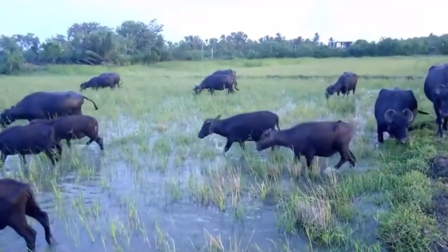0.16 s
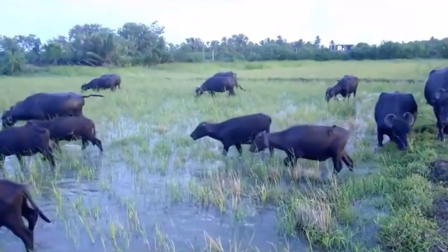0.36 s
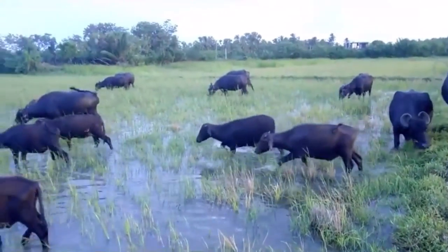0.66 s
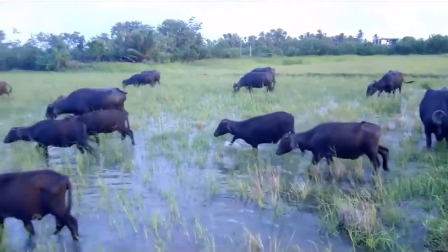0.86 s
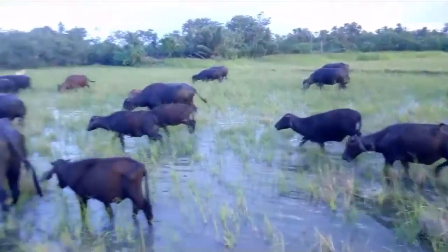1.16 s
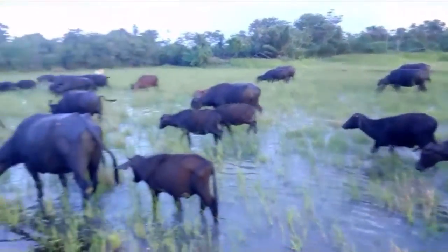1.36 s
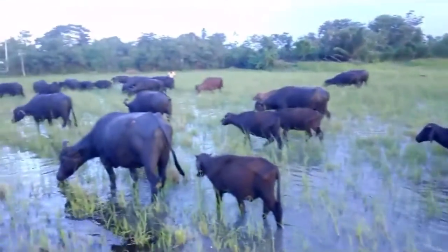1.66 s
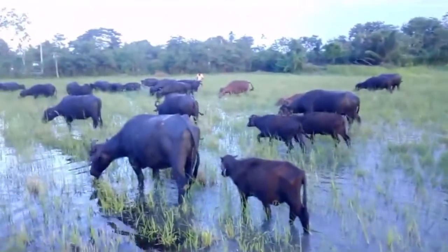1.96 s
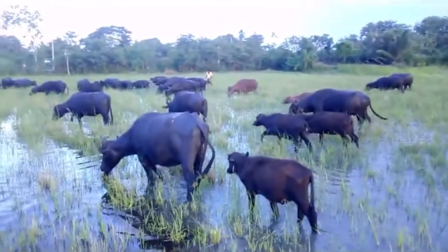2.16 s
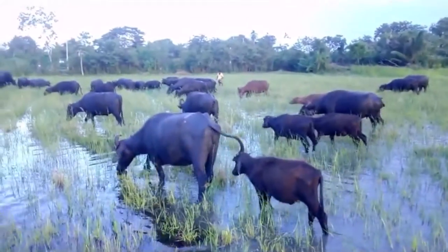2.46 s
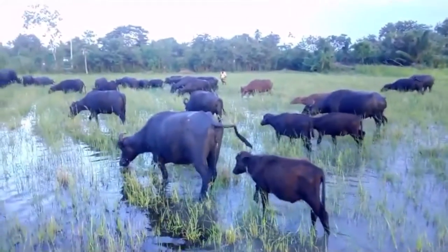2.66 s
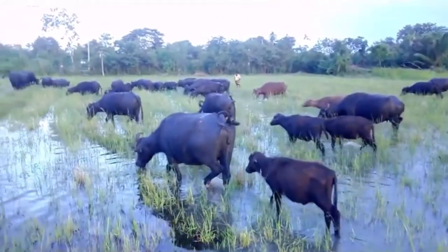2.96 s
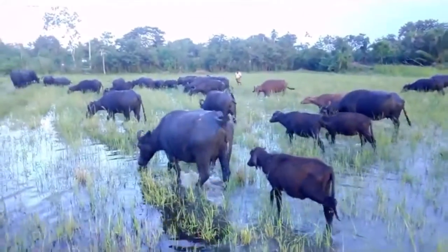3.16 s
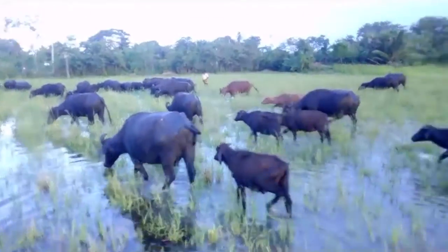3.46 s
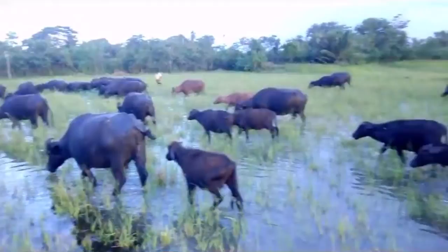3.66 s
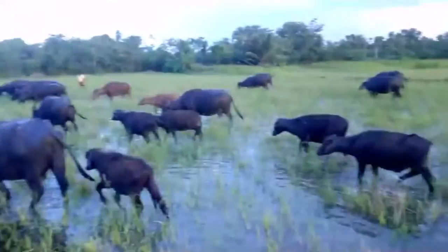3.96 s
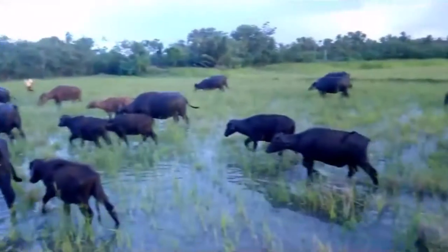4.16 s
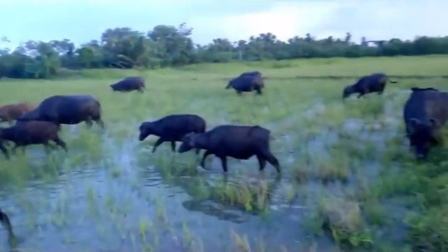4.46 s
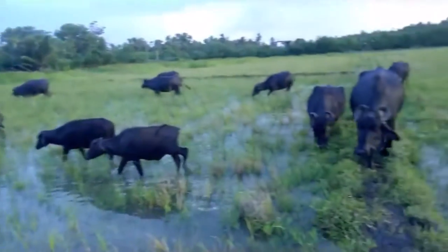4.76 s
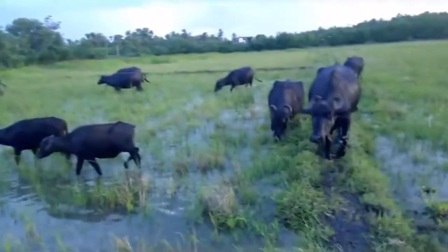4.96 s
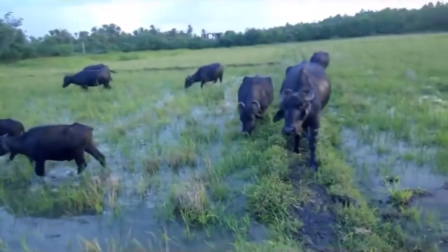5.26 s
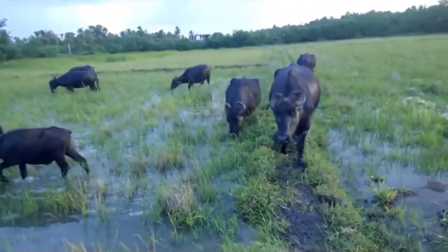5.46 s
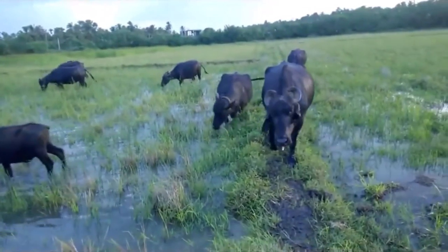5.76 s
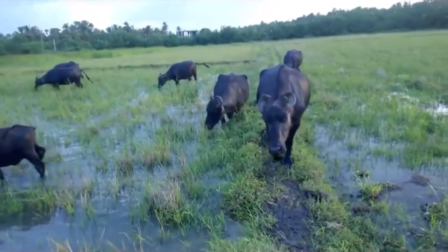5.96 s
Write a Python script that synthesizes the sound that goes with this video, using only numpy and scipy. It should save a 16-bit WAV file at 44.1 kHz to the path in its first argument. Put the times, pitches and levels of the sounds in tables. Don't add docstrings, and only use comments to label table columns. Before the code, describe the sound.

A water buffalo's loud nasal moo, already under way, sinks into a creak, then the herd wades on with sloshing water, plops and soft wind rumble.

```python
import sys
import numpy as np
from scipy import signal
from scipy.fft import rfft, irfft
from scipy.io import wavfile
from scipy.ndimage import uniform_filter1d

SR = 44100
rng = np.random.default_rng(int(sys.argv[2]) if len(sys.argv) > 2 else 0)


def unload_audio(sound):
    columns = np.transpose(np.atleast_2d(sound))
    steps = np.round(np.clip(columns, -1, 1) * 32767)
    wavfile.write(sys.argv[1], SR, steps.astype(np.int16))


def magnitude_from_level(level_db):
    exponent = np.asarray(level_db, float) / 20
    return 10 ** exponent


N = 268569


def evened(x):
    return x / np.sqrt(np.mean(x ** 2) + 1e-20)


def steady(x, size=1400):
    power = uniform_filter1d(uniform_filter1d(x ** 2, size), size)
    return x / np.sqrt(power + 1e-12)


def read(points, hz):
    f, value = np.transpose(points)
    return np.interp(np.log(hz + 1), np.log(f + 1), value)


def add(mix, s, sound):
    part = mix[round(s * SR):][:len(sound)]
    part += sound[:len(part)]


def swell(t, s, length):
    return np.exp(-((t - s) / length) ** 2)


def band_filter(x, order, hz, kind="low", run=signal.sosfilt):
    return run(signal.butter(order, hz, kind, fs=SR, output="sos"), x)


def resonate(x, hz, width):
    turn = np.exp(2j * np.pi * np.cumsum(hz * np.ones(len(x))) / SR)
    r = np.exp(-np.pi * abs(width) / SR)
    return 2 * (turn * signal.lfilter([1 - r], [1, -r], x / turn + 1e-18)).real


def wind():
    # f/Hz, density/dB per Hz
    rumble_spectrum = [(20, -45.5), (38, -44), (52, -1), (64, 3.5), (85, -6.5), (120, -1.5), (170, -49.5)]
    # t/s, rise/dB
    gusts = [(0.0, 10), (.1, 0), (0.391, 10), (.54, 4), (.8, 12), (.85, 11.5), (1.2, 3.5), (1.36, 6.5),
             (1.48, 4), (1.75, 5), (1.95, 5), (2.35, 6), (2.53, 12.5), (3.02, 4), (3.2, 8), (3.42, 8),
             (3.6, 9), (3.719, 3), (4.41, 6), (5.19, 8.5), (5.331, 13), (5.5, 5), (5.6, 6), (5.87, 10)]
    breeze_db, easing_db_per_s, gust_s = -50.5, -1.84, 0.035
    tilt = magnitude_from_level(read(rumble_spectrum, np.fft.rfftfreq(N, 1 / SR)))
    rumble = irfft(rfft(rng.standard_normal(N)) * tilt, N)
    t = np.arange(N) / SR
    gusts_db = sum(db * swell(t, s, gust_s) for s, db in gusts)
    return steady(rumble, size=4000) * magnitude_from_level(breeze_db + easing_db_per_s * t + gusts_db)


def pump():
    # f/Hz, level/dB
    orders = [(73.2, -66), (147, -59), (220, -61), (294, -67.5)]
    drift = []
    for _ in range(5):
        slow = uniform_filter1d(uniform_filter1d(rng.standard_normal(N), 9000), 9000)
        drift.append(evened(slow))
    clock = np.cumsum(1 + 0.00602 * drift[-1]) / SR
    out = np.zeros(N)
    for (hz, db), waver in zip(orders, drift):
        out += np.sqrt(2) * magnitude_from_level(db + 2.0 * waver) * np.sin(2 * np.pi * hz * clock)
    return out


def fine_drips(drips_per_s=400., spread_db=3.0):
    size = magnitude_from_level(spread_db * np.minimum(rng.exponential(1, N), 3)) * (rng.random(N) < drips_per_s / SR)
    kind, drips = rng.integers(0, 24, N), np.zeros(N)
    t = np.arange(500) / SR
    for k, hz in enumerate(np.geomspace(600, 14000, 24)):
        drip = np.sin(2 * np.pi * hz * t * (1 + 8 * t)) * np.exp(-t * hz / 4.0) * np.sqrt(hz)
        drips += signal.oaconvolve(size * (kind == k), drip)[:N]
    return evened(drips)


def wash(patchy_db=2.0, flicker_db=1.44, drip_share=0.29):
    # f/Hz, density/dB per Hz
    water_spectrum = [(71, -13.5), (120, -13), (298, -8.5), (508, -7.5), (900, -5.5), (1310, -9.5),
                      (1900, -7.5), (2700, -7.5), (4500, -5.5), (6500, -7.5), (7300, -11.5), (8200, -26.5),
                      (10500, -27), (13500, -35)]
    # t/s, stir/dB
    stirring = [(0.0, 2.5), (0.9, 1.55), (1.08, 1), (1.25, -1), (1.58, 0.4), (1.9, -0.5), (2.3, 0),
                (2.55, 1.5), (2.7, 0.3), (3.3, 3.5), (3.65, 0.54), (4.1, 1), (4.35, 1), (4.5, 3),
                (4.76, -1), (5.17, 2), (5.6, 1.5), (6.09, -1.1)]
    # level/dB, share of stir, drift/dB per s as the herd nears
    layers = [(-49, 0.22, -0.98), (-56.5, 0.58, -0.68), (-50.5, 1.25, 0.43), (-49.5, 1.48, 0.1343),
              (-61.5, 1.5, -0.36)]
    # from f/Hz, to f/Hz
    layer_bands = [(125, 350), (400, 660), (750, 2700), (4800, 7500), (8500, 15500)]
    layer_reach = [170, 330, 430, 620, 780, 2600, 3100, 7000, 8500, 15500]
    # t/s, length/s, rise/dB, centre of the surge f/Hz
    strides = [(1.07, 0.028, 2.5, 450), (1.37, 0.034, 7.5, 232), (1.48, 0.032, 10, 340),
               (1.702, 0.03, 8, 650), (2.005, 0.033, 3, 495), (2.14, 0.041, 2, 696),
               (2.355, 0.11, 10.5, 203), (2.68, 0.042, 6, 203), (2.8, 0.17, 6, 645), (3.102, .04, 8, 554),
               (3.284, 0.15, 2.5, 605), (3.447, 0.082, -1, 250), (3.738, 0.029, 16.5, 310),
               (4.03, .04, 0.5, 232), (4.056, 0.13, 3.5, 1580), (4.165, 0.038, 10.5, 700),
               (4.35, 0.027, 9, 328), (4.58, 0.036, 7.5, 330), (4.682, 0.022, 9.5, 1430),
               (5.33, 0.1, 4.5, 540), (5.67, 0.026, 11, 302), (5.956, 0.058, 10.5, 358),
               (6.014, 0.17, 4.5, 2010), (0.964, 0.16, 5, 734), (1.8, 0.45, 3.5, 714),
               (5.463, 0.11, 1, 298), (4.23, 0.06, -5.5, 230), (3.81, .035, 6, 560), (5.0, .04, 5, 600),
               (5.31, .07, 6, 150)]
    # t/s, length/s, rise/dB, centre f/Hz
    lulls = [(2.35, 0.093, -14.5, 500), (3.88, 0.05, -12, 470), (4.73, 0.068, -11, 550),
             (5.58, .05, -10, 540), (3.8, 0.035, -14, 640), (3.52, 0.027, -3, 470), (4, 0.044, -4, 530),
             (4.7, 0.067, -6, 340), (4.8, 0.099, -2, 270), (5.2, 1, -5, 3770), (4.62, 0.07, -13, 680),
             (5.9, 0.12, -3.5, 830), (3.6, 0.05, -8, 210), (1.34, .05, -8, 215), (4.05, .04, -8, 520),
             (2.38, .04, -6, 1550), (2.8, .06, -5, 215), (2.96, 0.068, 2, 1800), (1.5, .05, -8, 190),
             (6.2, 0.08, -17, 700)]
    surge_octaves, lull_octaves = 0.96, 0.5

    drips = fine_drips()
    hz, t, z = signal.stft(rng.standard_normal(N) + drip_share * drips, SR, nperseg=512)
    patches = evened(uniform_filter1d(uniform_filter1d(rng.standard_normal(z.shape), 8, 0), 8, 1))
    flicker = evened(uniform_filter1d(rng.standard_normal(len(t)), 3))

    surges = np.zeros(z.shape)
    for rows, octaves in ((strides, surge_octaves), (lulls, lull_octaves)):
        for s, length, db, f in rows:
            across = swell(np.log2(hz + 1), np.log2(f), octaves)
            surges += db * np.outer(across, swell(t, s, length))

    shape = read(water_spectrum, hz)
    power = magnitude_from_level(2 * shape) * 2 * hz[1] / SR
    stir_db = np.interp(t, *np.transpose(stirring))
    lift = []
    for (db, share, drift), (lo, hi) in zip(layers, layer_bands):
        band_db = 10 * np.log10(power[(hz >= lo) & (hz < hi)].sum())
        lift.append(db + share * stir_db + drift * t - band_db)
    blend = np.array([np.interp(hz, layer_reach, np.repeat(row, 2)) for row in np.eye(len(layer_bands))]).T

    wet = np.clip(hz / 3100.0, 0, 1)[:, None]
    texture_db = patchy_db * patches + flicker_db * wet * flicker
    z = z * magnitude_from_level(shape[:, None] + blend @ np.array(lift) + surges + texture_db - 2.5)
    return signal.istft(z, SR, nperseg=512)[1][:N]


def ticks():
    # t/s, peak level/dB
    bursts = [(1.0087, -27), (1.0437, -33), (1.9714, -37), (2.0413, -30), (2.1475, -45), (2.207, -36),
              (2.828, -32), (2.9038, -36), (3.474, -26), (3.7723, -25), (3.7962, -26), (5.1994, -27),
              (5.2556, -24.5), (5.3986, -45)]
    out, t = np.zeros(N), np.arange(600) / SR
    for (s, db), noise in zip(bursts, rng.standard_normal((len(bursts), len(t)))):
        bright = band_filter(noise, 1, [5500, 9500], "band")
        add(out, s, magnitude_from_level(db - 3.5 - 60 * t / 0.0077) * bright)
    return out


def clacks():
    # t/s, peak level/dB, f/Hz
    pockets = [(2.1468, -26, 780), (2.1468, -29, 1510), (2.1478, -30, 2430), (2.1478, -32, 3700),
               (2.148, -37, 5950), (1.9935, -31, 2400), (1.9935, -33, 530), (1.9935, -38, 6800),
               (1.997, -33.5, 1010), (2.4852, -28.5, 2530), (2.4852, -28, 4070), (2.4855, -34, 5800),
               (2.5148, -31, 4300), (2.518, -33, 6100), (1.5, -27, 6450), (5.056, -29, 1690),
               (5.131, -36, 880), (5.012, -34.5, 1100), (5.178, -35, 1310), (3.7715, -34, 6500),
               (3.7975, -33, 6300), (3.829, -35, 5400), (3.94, -34.5, 4100), (3.942, -36.5, 2020),
               (4.6, -33, 5900), (3.742, -33, 930), (4.2, -34, 900), (3.0695, -34, 460), (3.3, -32.5, 1070),
               (1.304, -40, 760), (2.3, -36, 4360), (3.4402, -36, 1630), (4.992, -36, 1500),
               (2.168, -38, 1670), (2.7, -32, 4200), (3.7, -33, 860), (4.1, -34, 800)]
    t60 = 0.019
    out, t = np.zeros(N), np.arange(1500) / SR
    for s, db, hz in pockets:
        add(out, s, magnitude_from_level(db - 60 * t / t60) * np.sin(2 * np.pi * hz * t))
    return out


def splashes():
    # t/s, peak level/dB, ring f/Hz, treble share/dB
    water_splashes = [(1.07, -31, 844, -8), (1.536, -29.5, 875, -19), (1.56, -32.5, 755, 0), (1.934, -40, 740, 1),
                      (1.997, -36, 1006, -14), (2.021, -29, 960, -11), (2.1467, -36, 1140, -1),
                      (2.62, -34, 540, -23), (2.8, -29, 730, -8), (2.826, -27.5, 697, -5), (2.882, -36, 704, -16),
                      (3.069, -27, 800, -16), (3.269, -37, 311, -13), (3.426, -32.5, 700, -27),
                      (3.542, -32, 700, -2), (3.584, -30, 835, -9), (3.632, -31, 920, -23), (3.705, -41, 666, -20),
                      (3.725, -22.5, 800, -24), (4.103, -28.5, 980, -24), (4.1622, -17, 876, -15),
                      (4.177, -25, 870, -7), (4.526, -31, 790, -10), (4.56, -28, 1380, -25),
                      (4.665, -31, 1510, -6.5), (5.155, -39, 680, -9), (5.311, -30.5, 487, -4),
                      (5.692, -29.5, 400, -1), (5.977, -33, 313, -7),
                      (1.608, -29, 6480, -27), (2.109, -30.5, 2430, -7), (2.375, -32, 3850, -17),
             (2.4854, -34, 2380, 1), (2.515, -28, 4900, -3), (2.549, -28, 4780, -10),
             (3.211, -23, 4300, -30), (3.771, -34, 6700, -0.5), (3.797, -33, 6370, -9),
             (3.938, -42, 2030, -10), (3.968, -26.5, 5400, -18), (4.022, -30.5, 1690, -8),
             (4.447, -27.5, 4500, -9), (4.47, -23, 5800, -9), (5.0105, -27.5, 2480, -20),
             (5.055, -38, 1670, -18), (5.1882, -26, 5100, -11), (5.218, -30, 1770, -14),
             (5.44, -30.5, 1720, -10), (5.666, -27, 1860, -4.5), (5.774, -31, 2360, -6),
             (5.828, -35.5, 2370, 0), (6.004, -32, 2380, -26), (2.208, -33, 6760, -20),
             (2.292, -29, 5800, -12), (3.543, -33, 5600, -23), (4.168, -26, 6130, -7),
             (4.211, -30, 6000, -7), (4.103, -28, 1760, -12), (4.146, -32, 1950, -9),
             (4.183, -26, 5760, -8), (2.486, -36, 4130, -15), (2.499, -36, 1860, -12),
             (4.222, -32, 5960, -13), (1.9928, -33, 2310, -5), (2.166, -32, 1500, -4),
             (2.827, -31, 3110, -19), (3.089, -24, 4900, -15), (3.722, -30, 960, -20),
             (5.132, -37, 880, -14), (5.274, -30, 1810, -16), (5.805, -29, 6650, -11),
             (5.847, -34, 2200, -8), (5.79, -33, 2300, -5.5), (5.839, -34, 4290, -9),
             (3.596, -30, 1500, -8), (2.965, -27.5, 1770, -20)]
    ring_s, ring_fall = 0.039, 0.21
    out, t = np.zeros(N), np.arange(4000) / SR
    impacts = water_splashes
    noise = rng.standard_normal((len(impacts), 2, len(t)))
    onset = 1 - np.exp(-t / 0.00089)
    for (s, db, hz, spray_db), (froth_noise, spray_noise) in zip(impacts, noise):
        t60 = ring_s * (hz / 1e3) ** -ring_fall
        bubble = np.sin(2 * np.pi * hz * t * (1 + 0.6 * t))
        froth = .45 * evened(resonate(froth_noise, hz * (1 + 1.8 * t), .2 * hz))
        ring = 1.04 * (bubble + froth) * magnitude_from_level(-60 * t / max(t60, .005))
        hiss = evened(band_filter(spray_noise, 8, [1000, 7200], "band"))
        spray = magnitude_from_level(spray_db + 8.0 - 60 * t / 0.025) * hiss
        add(out, s, magnitude_from_level(db - 6.5) * onset * (ring + spray))
    return out


def echoes(x):
    # f/Hz, t60/s
    field_decay = [(200, 0.45), (700, 0.18), (2000, 0.12), (5000, 0.15)]
    taps = np.zeros(SR)
    at = np.arange(1200, SR - 80, 80)
    taps[at + rng.integers(0, 80, len(at))] = rng.choice([-1., 1.], len(at))
    hz, t, z = signal.stft(taps, SR, nperseg=256)
    decay = magnitude_from_level(-60 * t / read(field_decay, hz)[:, None])
    tail = signal.istft(z * decay, SR, nperseg=256)[1]
    return signal.fftconvolve(x, tail / np.linalg.norm(tail))[:len(x)]


def in_the_field(call):
    # delay t/s, level/dB
    slaps = [
        (0.059, -34),
        (0.114, -22),
        (0.158, -28.5),
    ]
    echo_db = -13
    thin = band_filter(call, 2, 900, "high")
    slapped = sum(magnitude_from_level(db) * np.roll(thin, round(delay * SR)) for delay, db in slaps)
    return call + slapped + magnitude_from_level(echo_db) * echoes(call / 8 + thin)


def tube(modes, steep):
    hz = abs(np.fft.fftfreq(8192, 1 / SR))
    power = sum(magnitude_from_level(2 * db) / (1 + (2 * (hz - f) / width) ** 2) ** steep for f, width, db in modes)
    log_gain = .5 * np.log(power + 1e-10)
    return np.exp(np.conj(signal.hilbert(log_gain)))


def throat(drive, modes, steep=1.4):
    response = np.fft.ifft(tube(modes, steep)).real[:4096]
    return steady(signal.oaconvolve(drive, response)[:len(drive)])


def gliding_throat(t, turns, hz, modes, steep=2.0):
    # t/s, resonance shift/%
    neck = [(0.0, 2), (.07, 3), (.16, 3), (.26, 1), (.4, 1), (.5, -2), (.57, -1.5), (.65, -1)]
    # f/Hz, share
    follow = [(1000, .8), (1700, .3), (2350, .5), (3200, 0.98), (3950, 0.81)]
    gain, grid = tube(modes, steep)[:4096], np.arange(4096) * SR / 8192
    shift = np.interp(t, *np.transpose(neck)) / 100
    out = np.zeros(len(t))
    for k in range(1, 36):
        seen_hz = k * hz / (1 + shift * read(follow, k * hz))
        out += (np.interp(seen_hz, grid, gain) * np.exp(2j * np.pi * k * turns)).real
    return steady(out)


def fold_cycles(t, hz):
    shake = evened(uniform_filter1d(rng.standard_normal(len(t)), 300))
    turns = np.cumsum(hz * (1 + 1 / 700 * shake)) / SR
    return turns + .05 - np.interp(.768, t, turns) % 1


def through_nose(call, t, lead):
    # t/s, centre f/Hz, share 0-1
    nose = [(0.0, 786, 0), (.1, 750, 0.65), (.24, 803, 0.85), (.36, 823, 1), (.5, 795, 1), (.58, 750, 0.84),
            (.65, 734, 0.88), (.72, 780, 0.48)]
    at, centre_hz, share = np.transpose(nose)
    long_t = np.arange(-lead, 2 * len(t) - lead) / SR
    nosed = resonate(call[:2 * len(t)], np.interp(long_t, at, centre_hz), 292)
    swallowed = np.pad(np.clip(np.interp(t, at, share), 0, 1), (0, len(t)))
    add(call, 0, -swallowed * nosed)


def last_puffs(call, lead):
    # t/s, level/dB
    puffs = [(.792, -20), (.805, -22), (.838, -23), (.85, -24), (.875, -36)]
    t = np.arange(3000) / SR
    tones = np.sin(2 * np.pi * 305.0 * t) + 0.22 * np.sin(2 * np.pi * 460.0 * t)
    puff = magnitude_from_level(-760. * t) * (1 - np.exp(-t / 0.0003)) * tones
    for s, db in puffs:
        add(call, s + lead / SR, magnitude_from_level(db) * puff)


def moo():
    # t/s, pitch f/Hz, effort level/dB, mouth opening level/dB, chest hum level/dB
    contour = [
        (0.0, 143.5, -20.5, -6.5, 2),
        (0.102, 154.9, -12.5, -10, 3),
        (0.226, 158.6, -6.5, -12, -3),
        (0.361, 159.2, -6, -16, -1.2),
        (0.495, 153.6, -6, -10.5, -4),
        (0.59, 142, -7, -19, -2.3),
        (0.661, 126.8, -8.5, -15.5, 3),
        (0.71, 108.7, -16, -5.5, 0.3),
        (0.784, 79.9, -15.5, -11.5, -1.5),
    ]
    # f/Hz, width/Hz, level/dB
    chest_modes = [(277, 34.5, 15.5), (626.3, 57, 13.5), (485, 110, -29), (158, 80, -43.5), (706, 43, -5)]
    # f/Hz, width/Hz, level/dB
    mouth_modes = [(925, 240, -17.5), (1083, 120, 4.5), (1260, 150, 1.5), (1420, 75, -9.5),
                   (1584, 130, -12), (1720, 137, 2), (1770, 58, -23.5), (2088, 145, -7.5), (2245, 86, -10),
                   (2350, 76, -6.5)]
    # f/Hz, width/Hz, level/dB
    rasp_modes = [(2545, 40, -18), (2727, 126, -15.5), (2950, 70, -23.5), (3210, 110, -17),
                  (3467, 110, -17.5), (3837, 110, -18.5), (4136, 63, -22.5), (4130, 82, -35.5)]
    # f/Hz, width/Hz, level/dB
    gape_modes = [(1090, 110, 1), (1387, 39, 5), (1726, 115, 2.5), (2070, 43, 4), (2353, 88, 0),
                  (2860, 164, -1.5), (3190, 54, -2), (2630, 90, -6), (3460, 104, -11.5), (4000, 130, -15),
                  (4290, 110, -21)]
    # t/s, rasp level/dB
    rasp_swell = [(0.0, 0.5), (.14, -2), (.3, 0), (.45, .5), (.53, -1.5), (.62, -2), (.68, 5), (.75, 1)]
    rasp_level_db, rasp_effort, rasp_opening = -17, 0.78, 0.49
    gape_start = .93
    snap_db, lips_shut_s = -20, .771

    s, *columns = np.transpose(contour)
    lead = 4000
    t = np.arange(-lead, round(s[-1] * SR) + lead) / SR
    hz, chest_db, open_db, hum_db = (np.interp(t, s, c) for c in columns)
    mouth_db = chest_db + open_db
    rasp_db = rasp_level_db + rasp_effort * chest_db + rasp_opening * open_db
    rasp_db = rasp_db + np.interp(t, *np.transpose(rasp_swell))

    hz = uniform_filter1d(hz, 900)
    turns = fold_cycles(t, hz)
    folds = sum(np.cos(2 * np.pi * k * turns) for k in range(1, 56))
    air = rng.standard_normal(len(t))
    drive = evened(folds) + .03 * air
    uneven = magnitude_from_level(1.8 * rng.standard_normal(400))[(turns + .4).astype(int)]
    creak = uneven * drive + .25 * air * np.exp(-(turns % 1) / .3)

    parted = np.clip((t - .635) / 0.076, 0, 1)
    wide = np.clip((t - .67) / 0.056, 0, 1)
    narrow_modes = [(f * (gape_start if f > 2500 else 1), width, db) for f, width, db in gape_modes]
    gape = (1 - wide) * throat(creak, narrow_modes, steep=2.1)
    gape += wide * throat(creak, gape_modes, steep=2.43)
    closed_modes = mouth_modes + rasp_modes
    closed = gliding_throat(t, turns, hz, closed_modes, steep=2.07) + 0.091 * throat(air, closed_modes)
    upper = (1 - parted) * closed + parted * np.roll(gape, -4)
    mouth = band_filter(upper, 3, 2170, run=signal.sosfiltfilt)
    rasp = steady(upper - mouth)

    lips = magnitude_from_level(-850. * np.maximum(t - lips_shut_s, 0))
    bare = band_filter(drive, 4, [350, 3150], "band", run=signal.sosfiltfilt)
    snaps = magnitude_from_level(snap_db) * parted * lips * uneven * bare

    chest = throat(drive, chest_modes, steep=1.634)
    hum = band_filter(chest, 3, 400, run=signal.sosfiltfilt)
    voice = magnitude_from_level(chest_db) * (chest + (magnitude_from_level(hum_db) - 1) * hum)
    voice += lips * (magnitude_from_level(mouth_db) * steady(mouth) + snaps)
    voice += lips ** .55 * magnitude_from_level(rasp_db) * rasp
    stop = magnitude_from_level(-1500. * np.maximum(t - s[-1], 0))

    call = np.pad(voice * stop, (0, N))
    through_nose(call, t, lead)
    call = band_filter(call, 4, 148, "high")
    last_puffs(call, lead)
    return in_the_field(call)[lead:lead + N]


def scene():
    return (moo() + wash() + wind() + splashes() + clacks() + ticks() + pump())[None]


def low_pass(x):
    return signal.sosfilt(signal.butter(12, 17040, fs=SR, output="sos"), x)


def record(dry):
    # t/s, length/s, loss/dB, from f/Hz
    treble_dips = [(.334, .026, -14, 3000), (.484, .026, -14, 1900), (.718, .022, -16, 3000),
                   (.806, .03, -16, 4100), (1.335, .022, -17, 800), (2.19, .022, -17, 800),
                   (3.108, .022, -15, 900), (3.663, .03, -18, 900), (3.895, .028, -18, 900),
                   (4.474, .028, -20, 600), (5.091, .024, -17, 1500), (5.24, .024, -17, 1000),
                   (5.606, .026, -17, 1500), (6.083, .04, -30, 1000)]
    # from f/Hz, to f/Hz
    spared_bands = [(1300, 1850), (2250, 2850), (4300, 5000), (5500, 6800)]
    shelf_hz, shelf_db, edge_hz = 14400, 11, 15600
    hz, t, z = signal.stft(dry, SR, nperseg=512)
    kept = rng.random((len(treble_dips), 60)) < .3
    spared = sum((hz > lo) & (hz < hi) for lo, hi in spared_bands) > 0
    loss = np.zeros(z.shape[1:])
    for (s, length, db, from_hz), lucky in zip(treble_dips, kept):
        lucky_bins = lucky[(hz // 430).astype(int)] & (hz < 7500)
        hit = (hz > from_hz) & ~spared & ~lucky_bins
        loss += db * hit[:, None] * np.clip(1.5 - 3 * abs(t - s) / length, 0, 1)
    loss += (shelf_db * (hz > shelf_hz) - 90 * (hz > edge_hz))[:, None]
    mix = signal.istft(z * magnitude_from_level(loss), SR, nperseg=512)[1][:, :N]
    return low_pass(mix)


dry = scene()
out = record(dry)
unload_audio(out)
```